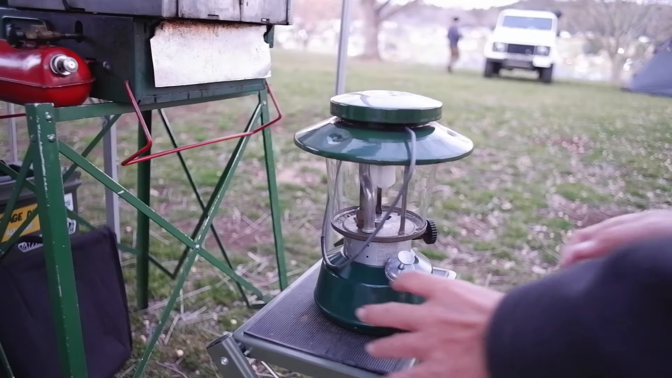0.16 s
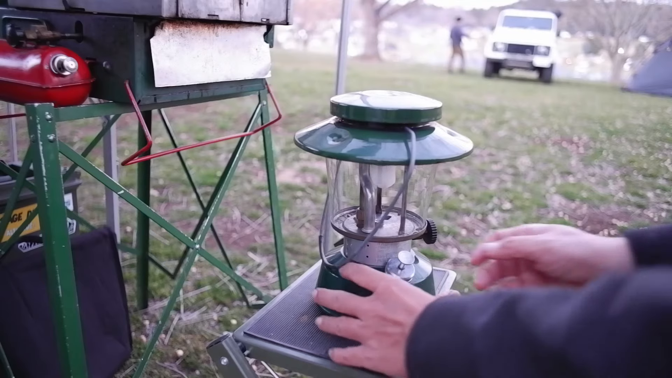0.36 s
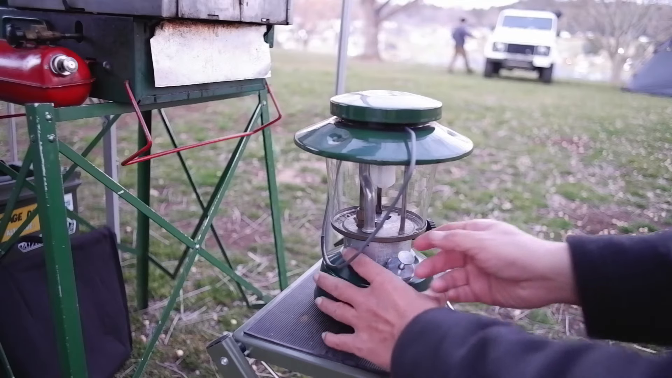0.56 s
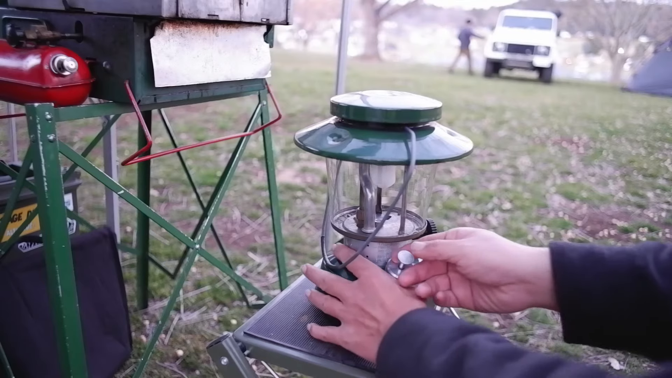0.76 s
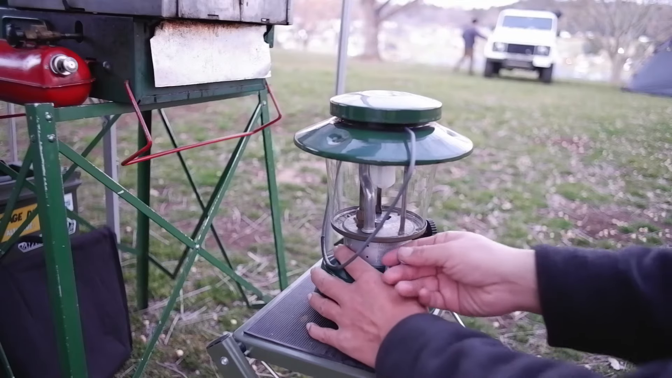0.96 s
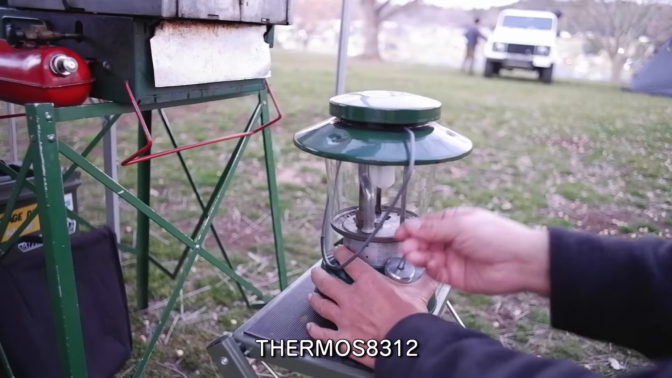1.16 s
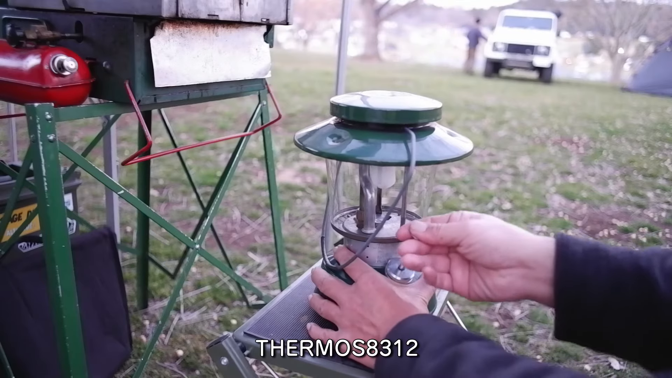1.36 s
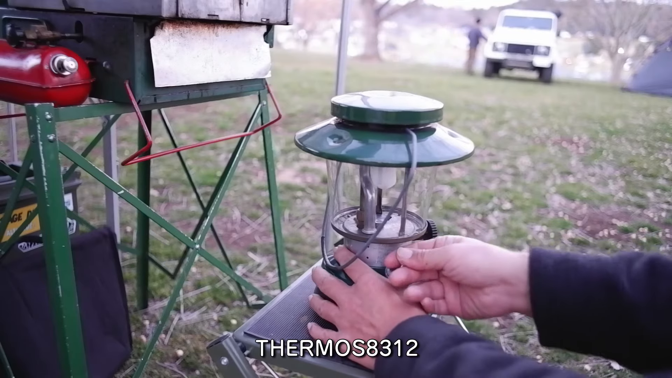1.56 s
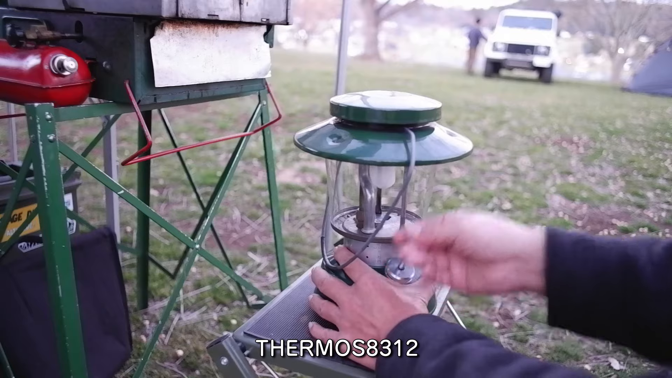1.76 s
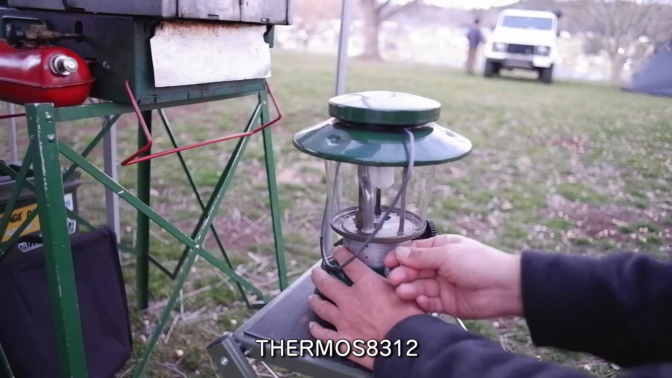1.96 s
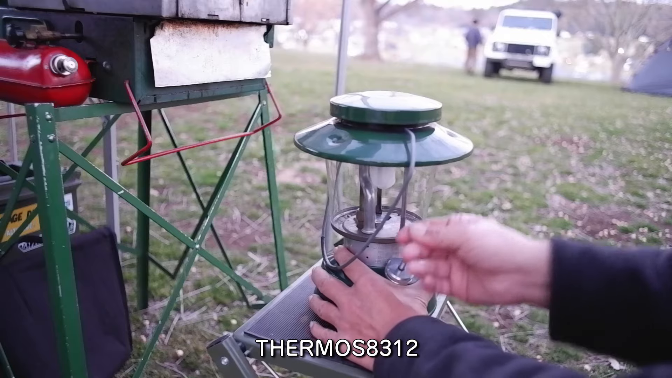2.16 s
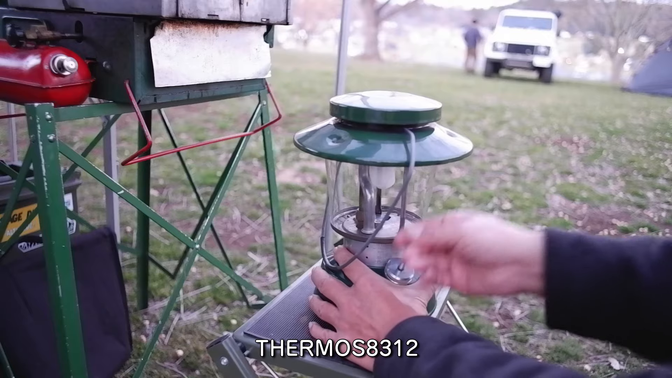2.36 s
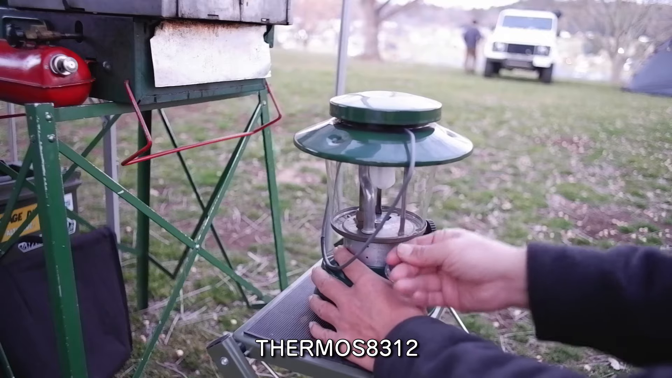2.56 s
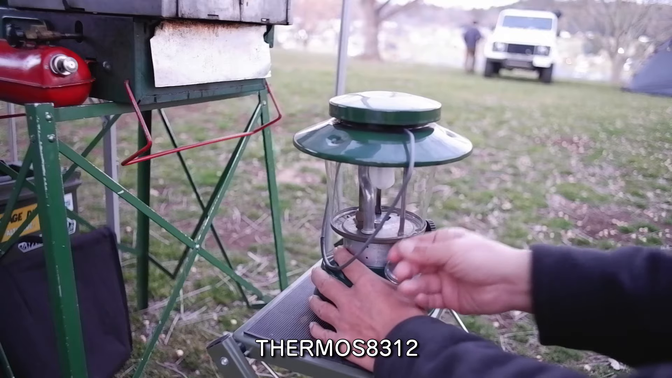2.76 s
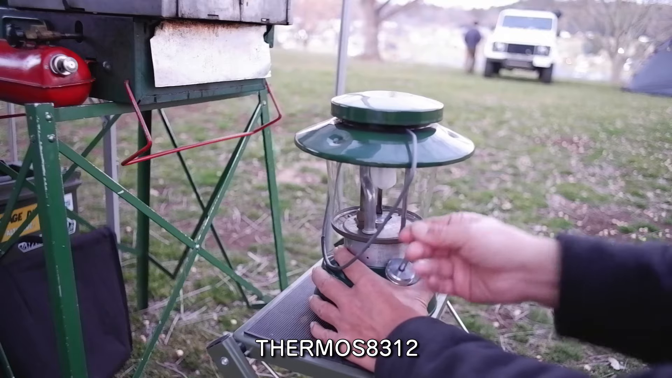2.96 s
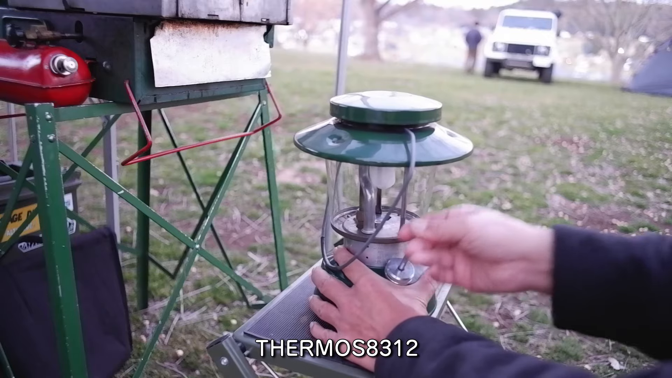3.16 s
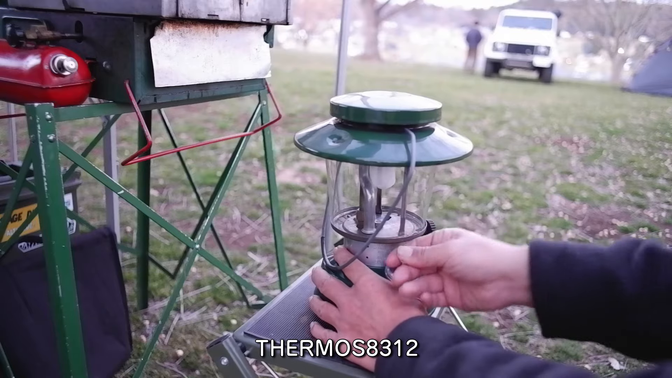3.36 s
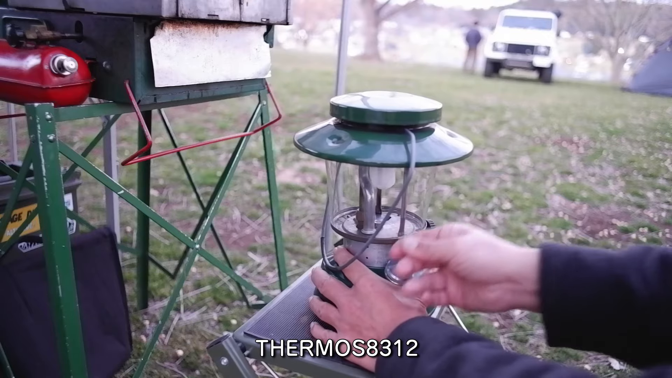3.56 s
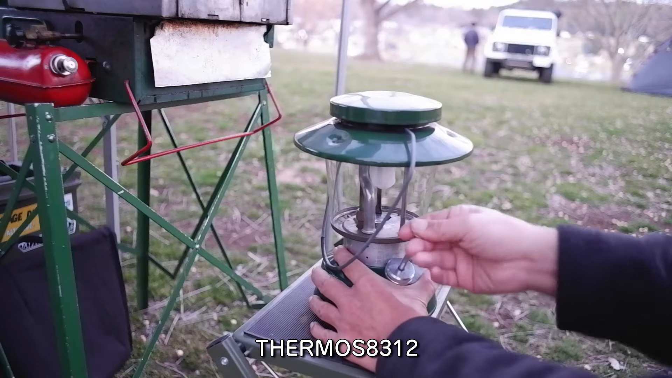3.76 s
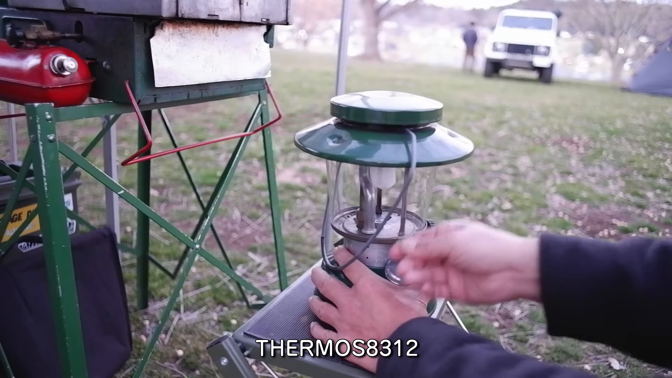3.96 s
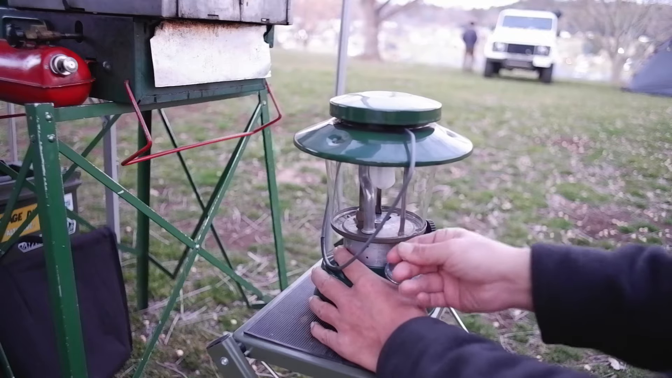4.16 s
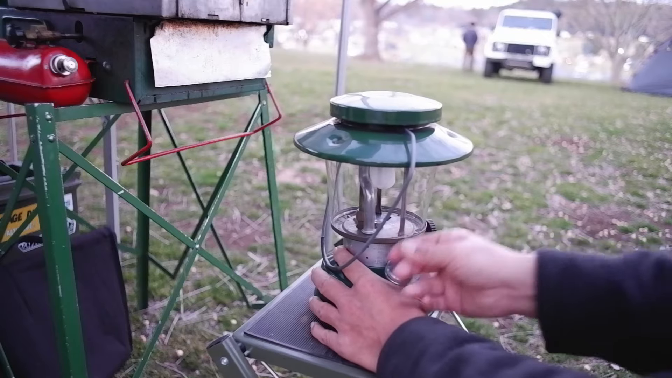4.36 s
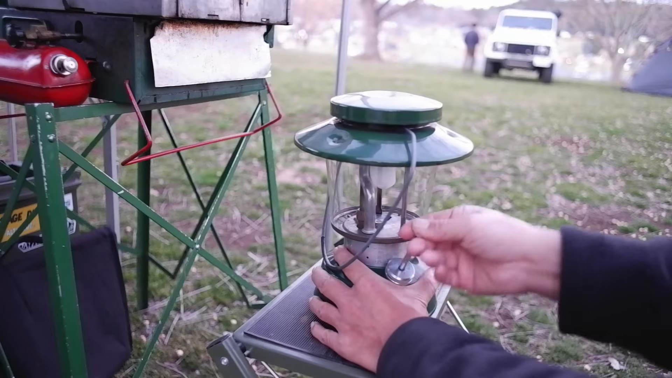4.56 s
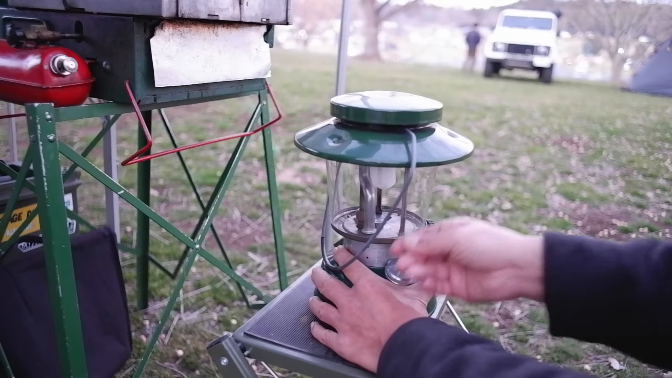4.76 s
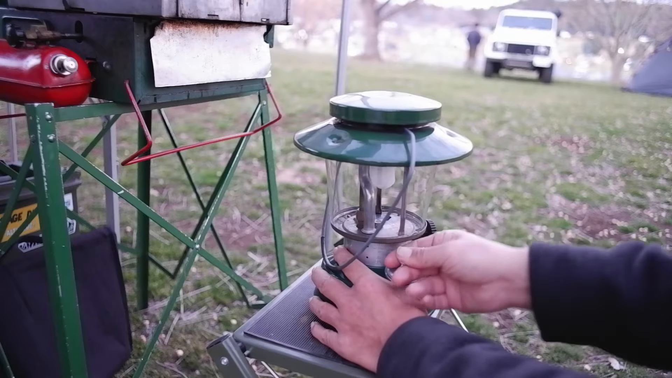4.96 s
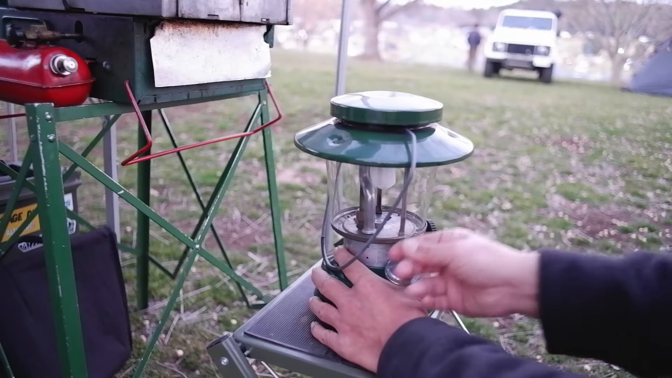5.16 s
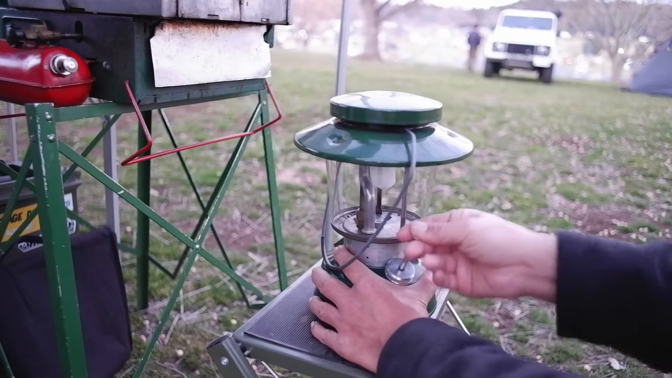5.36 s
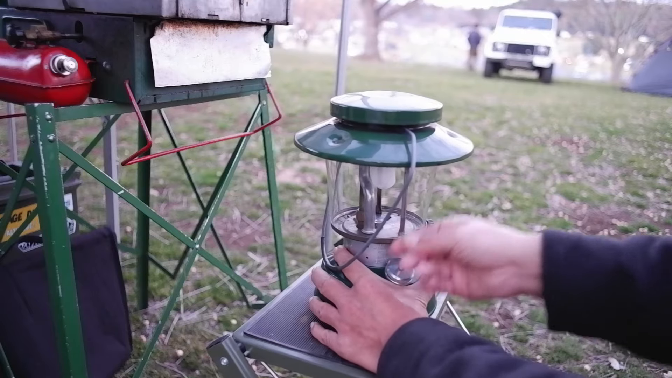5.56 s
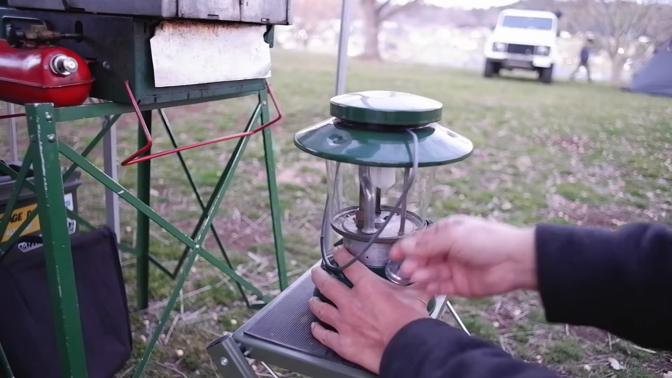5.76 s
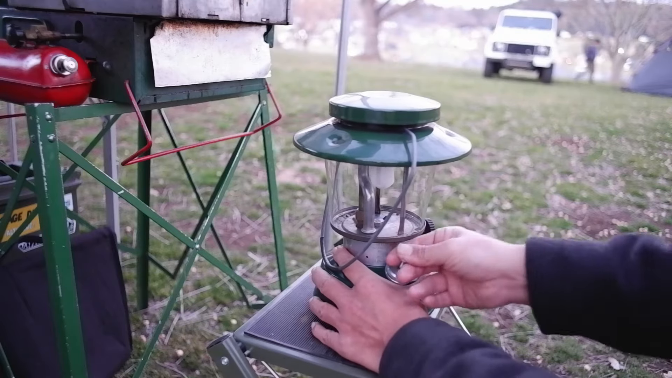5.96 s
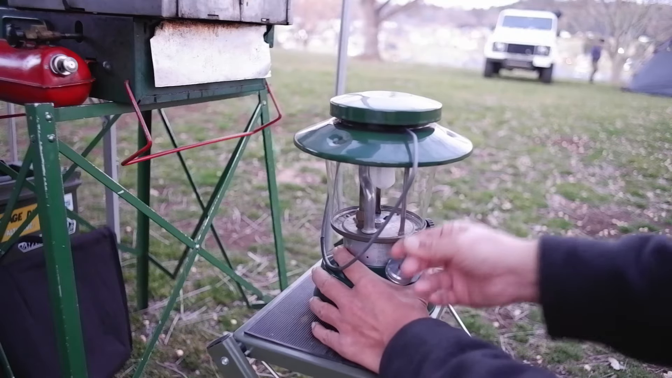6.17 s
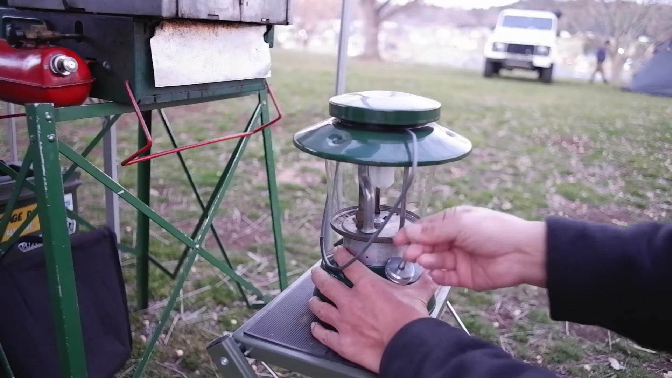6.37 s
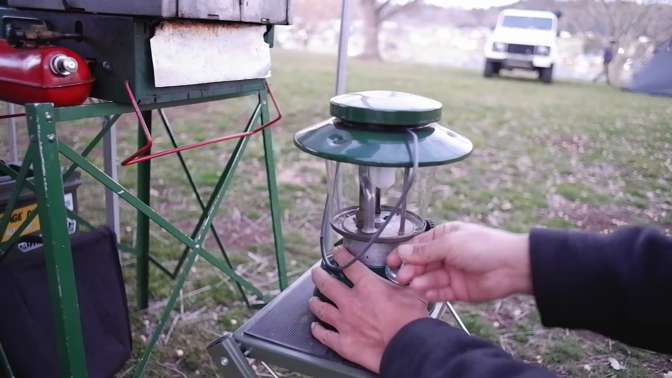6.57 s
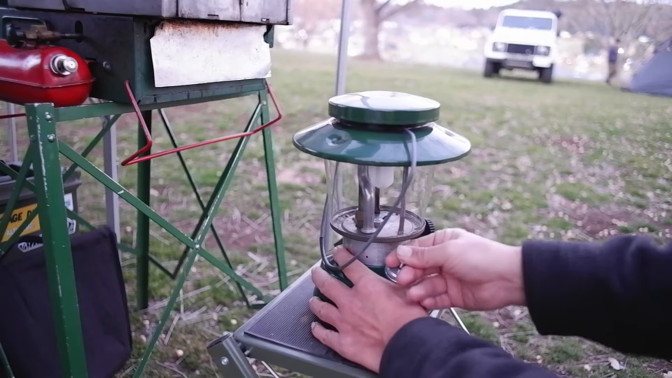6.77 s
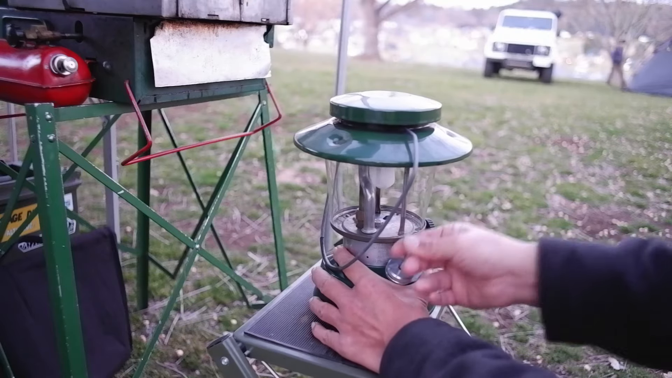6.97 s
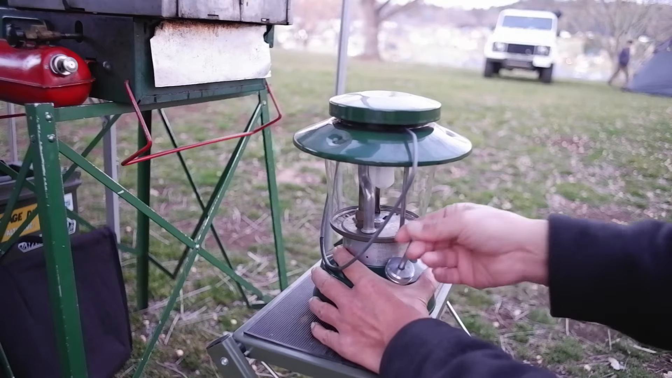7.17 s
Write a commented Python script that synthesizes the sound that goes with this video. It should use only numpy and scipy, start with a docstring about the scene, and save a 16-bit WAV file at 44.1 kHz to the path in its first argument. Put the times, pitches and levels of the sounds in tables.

```python
"""A liquid-fuel lantern is pumped up on a camp table outdoors, close to a stereo microphone.
Over the faint rush of a still campsite a hand settles on it, takes hold and frees the knob with a clink.
From 1.65 s each stroke ends in a falling squeak of the pump's cup and a spit of air; the rod rubs,
the plunger sometimes clicks on its stop, and the steel tank rings.
Near 6 s the pressure builds: the squeak slides more slowly and stays higher."""
import sys
import numpy as np
from scipy import signal
from scipy.fft import rfft, irfft, next_fast_len
from scipy.io import wavfile
from scipy.ndimage import map_coordinates

SR = 44100
rng = np.random.default_rng(int(sys.argv[2]) if len(sys.argv) > 2 else 0)


def to_wav(sig):
    """Store sig (one row per channel, or 1-D mono) as 16-bit WAV at the path in sys.argv[1].

    Samples outside -1..1 are clipped; the rate is SR.
    """
    pcm = np.clip(np.atleast_2d(sig), -1, 1) * 32767
    pcm = np.round(pcm).astype(np.int16)
    wavfile.write(sys.argv[1], SR, pcm.T)  # frames by channels


N = 318133


def amp(db):
    return 10 ** (np.asarray(db) / 20)


def unit(x):
    return x / np.sqrt(np.mean(x ** 2) + 1e-20)


def along(points, hz):
    """Read (freq_hz, value) points on a log frequency axis."""
    freqs, values = np.transpose(points)
    return np.interp(np.log(hz + 1), np.log(freqs + 1), values)


def wobble(rate_hz, size):
    """A smooth random curve with rate_hz knots a second."""
    knots = rng.standard_normal(int(size * rate_hz / SR) + 4)
    return map_coordinates(knots, [np.arange(size) * rate_hz / SR])


def filtered(x, response):
    """x through a complex response of frequency."""
    size = x.shape[-1]
    padded = next_fast_len(size + SR)
    return irfft(rfft(x, padded) * response(np.fft.rfftfreq(padded, 1 / SR)), padded)[..., :size]


def coloured(x, spectrum):
    """x through a curve of (freq_hz, gain_db) points."""
    return filtered(x, lambda hz: amp(along(spectrum, hz)))


def resonate(x, modes):
    """x through (pitch_hz, width_hz, gain_db) resonances."""
    return filtered(x, lambda hz: sum(amp(db) * 1j * hz * width / (pitch ** 2 - hz ** 2 + 1j * hz * width)
                                      for pitch, width, db in modes))


def noise(spectrum, size):
    """Coloured noise of rms 1."""
    return unit(coloured(rng.standard_normal(size), spectrum))


def grit(depth_db):
    """White noise of rms 1, clumped into tiny sharp grains."""
    return unit(rng.standard_normal(N) * amp(depth_db * np.clip(wobble(2500, N), -2, 2)))


def add(track, start_s, sound):
    """Mix a sound into the track."""
    part = track[max(round(start_s * SR), 0):][:len(sound)]
    part += sound[:len(part)]


# open air, far from the microphone: freq_hz, level_db
CAMPSITE_SPECTRUM = [(15, -72.5), (25, -25), (82, -15), (108, -7.5), (141, -4.5), (200, -8), (242, -5.5),
                     (354, -8), (476, -12), (2350, -17), (4030, -26), (5880, -31), (16000, -35.5)]


def campsite():
    """A far outdoor rush, mostly common to both channels."""
    mid = noise(CAMPSITE_SPECTRUM, N)
    side = amp(-10) * noise(CAMPSITE_SPECTRUM, N)
    return amp(-63.5 + 0.45 * wobble(2.54, N)) * np.array([mid + side, mid - side])


# hand and sleeve on the lantern, close up: start_s, level_db
HAND_BUMPS = [(0.026, -47.5), (0.052, -55), (0.305, -60), (1.157, -60), (6.194, -51.5)]


def hand_bumps():
    """A hand settles on the lantern with dull, short taps."""
    out = np.zeros(N)
    t = np.arange(SR // 4) / SR
    rise = 1 - np.exp(-t / 0.00083)
    dull = [(100, -27.5), (350, -0.5), (1300, -3), (3500, -18), (9000, -28), (16000, -41)]
    for start_s, level_db in HAND_BUMPS:
        add(out, start_s, amp(level_db + 4 - 60 * t / 0.11) * rise * noise(dull, len(t)))
    return out


# modes of the steel tank and hood: pitch_hz, level_db, t60_s
TANK_MODES = [(586, -3.5, 1.6), (900, -2, 0.48), (1366, 3, 0.64), (2160, 6.5, 0.48), (2900, -13.5, 0.89),
              (3020, -1.5, 1.04), (3430, 7.5, 0.2), (3870, -8, 0.52), (4050, -4, 0.29), (4200, -3, .35),
              (4830, 2, 0.3), (5800, 4.5, 0.46), (7000, -9, 0.59), (8333, -33, .35)]


def tank_ring(drive):
    """The tank's modes, shaken at random as hard as the lantern is sounding."""
    pitch_hz, level_db, t60_s = np.transpose(TANK_MODES)
    width_hz = np.log(1000) / (np.pi * t60_s)
    gain_db = level_db + 20 * np.log10(SR / (2 * np.pi * width_hz))
    shaking = np.abs(drive) * rng.standard_normal(N)
    return resonate(shaking, list(zip(pitch_hz, width_hz, gain_db)))


# resonances of pump tube and tank: pitch_hz, width_hz, gain_db
TUBE_MODES = [(439.5, 75, -1), (549, 12.9, 5), (755, 30, -14), (901, 176, -8.5), (1254.5, 45.7, 8),
              (1311, 34, 1), (1660, 37, -1), (2040, 91, -3), (2300, 87, -2), (2875, 23, -7)]


def pump_tube(x):
    """The tube and tank colour the knocks and squeaks made inside them."""
    return resonate(x, TUBE_MODES)


# fingers and rod catching on the tank: start_s, level_db, knock_offset_db
ROD_CATCHES = [(0.488, -44, 9), (0.5435, -34.5, -2), (0.6144, -44.5, -0.5), (0.855, -36, 0),
               (1.2645, -33, -21), (1.3136, -41.5, 2.5), (1.3613, -29, -33), (1.382, -40, -30),
               (1.9308, -30, -9.5), (1.9656, -25, -24), (2.262, -26, -12), (2.5526, -27, -15),
               (2.8566, -27, -17.5), (3.082, -23, -11.5), (3.1253, -26.5, -4), (3.3408, -31.5, -14),
               (3.3772, -41, -2), (3.6234, -34.5, -1.5), (4.7164, -43.5, -9), (5.254, -35, -32),
               (5.999, -31.5, -17), (6.037, -25, -7.5), (6.2594, -33, -16), (6.4285, -24.5, -17),
               (6.9544, -17.5, -14.5)]
# metal sliding on metal, close up: freq_hz, gain_db
SCRAPE_SPECTRUM = [(410, -31), (700, -0.5), (1350, 0), (1820, 2), (2190, -6), (2560, -4.5), (4210, -2),
                   (5330, -5), (5840, -0.5), (8210, -12.5), (16000, -14.5)]
# resonances of the scraped rod: pitch_hz, width_hz, gain_db
ROD_MODES = [(1720, 59, -20), (3685, 140, 0), (4140, 110, -3.5), (6200, 570, -16.5)]


def rod_rubbing(grip_s=0.51, slide_from_s=1.67, slide_rise_s=0.5):
    """Fingers rub the knob, then the rod scrapes unevenly through its cap, catching now and then."""
    catches, knocks = np.zeros((2, N))
    t = np.arange(SR // 4) / SR
    rise = 1 - np.exp(-t / 0.00063)
    # the rod snags faintly twice on every return
    snags = [(start_s + 0.19 + 0.03 * late, -41.5 + 2 * hard, -4.5)
             for start_s, *_ in PUMP_STROKES for late, hard in rng.standard_normal((2, 2))]
    for start_s, level_db, knock_offset_db in ROD_CATCHES + snags:
        add(catches, start_s, amp(level_db - 12.5 - 60 * t / 0.1) * rise)
        add(knocks, start_s, amp(level_db + knock_offset_db - 1.5 - 60 * t / 0.27) * rise)
    now = np.arange(N) / SR
    grip = amp(-70) * (now > grip_s)
    pumping = amp(-57) * np.clip((now - slide_from_s) / slide_rise_s, 0, 1)
    sliding = (grip + pumping) * unit(amp(7.2 * wobble(50, N)))
    scrape = (sliding + catches) * grit(depth_db=2.5)
    metal = amp(5) * coloured(scrape, SCRAPE_SPECTRUM) + amp(10) * resonate(scrape, ROD_MODES)
    return metal + pump_tube(knocks * rng.standard_normal(N))


# the pump knob is unlocked: start_s, level_db
KNOB_UNLOCK = [(0.6922, -16)]
# the clink's ring, bright knob modes over two low notes of the tank: pitch_hz, level_db, t60_s
CLINK_MODES = [(580, -22.5, 1.32), (920, -16.5, 0.57), (1610, -15, 0.33), (2150, -19, .33),
               (3400, -4, 0.18), (3750, -0.5, 0.14), (4400, -9, .17), (4600, -7, 0.22), (5470, -16, .16),
               (5660, 2, .14), (6126, -1, 0.15), (6200, 4.5, .19), (8150, -14, .27)]
# rattling metal of knob and plunger, close up: freq_hz, level_db
RATTLE_SPECTRUM = [(120, -67), (200, -22), (1000, -13.5), (1270, 0.5), (2090, -5), (3130, -5.5), (3690, -3),
                   (5040, -6), (6400, -0.5), (7410, -12), (9230, -19), (10100, -21), (16000, -33)]


def knob_clink():
    """The knob comes free with a rattle and a bright clink."""
    out = np.zeros(N)
    t = np.arange(SR) / SR
    rise = 1 - np.exp(-(t / 0.0035) ** 2)
    for start_s, level_db in KNOB_UNLOCK:
        clink = sum(amp(db + rng.normal() - 60 * t / t60_s) * np.sin(2 * np.pi * (hz * t + rng.random()))
                    for hz, db, t60_s in CLINK_MODES)
        rattle = amp(-60 * t / 0.13) * noise(RATTLE_SPECTRUM, len(t))
        add(out, start_s - 0.003, amp(level_db) * rise * (amp(-5.5) * rattle + amp(-15) * clink))
    return out


def back_pressure(time_s, slack=0.0845, half_built_s=5.75, firming_s=0.437):
    """0 slack to 1 firm: the first strokes meet little resistance, then the tank fills."""
    return slack + (1 - slack) * (0.5 + 0.5 * np.tanh((time_s - half_built_s) / firming_s))


# pump strokes, close to the microphone: start_s, squeak_db, air_db, tail_offset_db
PUMP_STROKES = [(1.653, -6.5, -16, -10.5), (2.064, -2, -11.5, -14.5), (2.36, -4.5, -11.5, -11),
                (2.643, -6.5, -13.5, -8), (2.904, -5, -13, -11.5), (3.172, -4.5, -12, -19),
                (3.438, -3, -11.5, -14), (3.72, -6.5, -11.5, -10), (3.99, -5, -11, -13.5),
                (4.258, -4.5, -11, -23.5), (4.515, -7, -10.5, -8.5), (4.788, -4, -11.5, -16),
                (5.049, -4, -11.5, -14.5), (5.319, -9.5, -10, -12), (5.583, -5.5, -10.5, -15),
                (5.783, -11, -9, -14.5), (6.065, -6.5, -11, -16), (6.337, -8, -9.5, -13.5),
                (6.611, -6.5, -12, -25), (6.874, -13.5, -8.5, -10), (7.142, -6.5, -11, -13)]
LEAD_S = 0.02  # a stroke's sound begins this long before the cup lets go at start_s
STROKE_TIME_S = np.arange(SR // 2) / SR - LEAD_S


def cup_squeaks(drop_hz=2100, tail_t60_s=0.15):
    """The cup lets go: its pitch drops steeply, then levels out while the note turns rough and fades."""
    out = np.zeros(N)
    for start_s, squeak_db, _, tail_offset_db in PUMP_STROKES:
        pressure = back_pressure(start_s)
        t = STROKE_TIME_S + 0.00169 * pressure  # back pressure lifts the cup a little sooner
        after = np.maximum(t, 0)
        # pressure raises and slows the slide; a stronger stroke slides deeper
        floor_hz = 300.13 + 148.5 * pressure - 12 * (squeak_db + 6)
        fall_s = 0.00135 * (1 + pressure)
        pitch_hz = floor_hz + drop_hz / (1 + after / fall_s)
        phase = 2 * np.pi * np.cumsum(pitch_hz * (1 + 0.0535 * wobble(491, len(t)))) / SR
        note = np.sin(phase) + 0.14 * np.sin(2 * phase) + 0.37 * np.sin(3 * phase)
        opening = 0.5 + 0.5 * np.tanh((t - 0.0007) / (0.00041 * (1 + 1.2 * pressure)))
        burst_s = 0.0049 * (1 + 3.2 * pressure)
        push_db = 3 * pressure * np.minimum(after / 0.0095, 1) ** 2
        burst = amp(push_db) * np.exp(-(after / burst_s) ** 4)
        flutter_db = 3.5 * wobble(220, len(t))
        tail = amp(tail_offset_db + 2.5 - 60 * after / tail_t60_s + flutter_db) / (1 + (t / 0.18) ** 4)
        add(out, start_s - LEAD_S, amp(squeak_db + 0.5) * opening * (burst + tail) * note)
    return pump_tube(out)


# hiss of the air, close up: freq_hz, gain_db
AIR_SPECTRUM = [(18, -84), (30, -17), (194, -21.5), (426, -5.5), (649, 2), (1070, 0), (1280, 1.5),
                (1460, 0), (3220, -3.5), (3580, -2), (5170, -9), (6380, -2.5), (7870, -14.5), (14800, -71),
                (16000, -61.5)]
# resonances blown by the air: pitch_hz, width_hz, gain_db
JET_MODES = [(1241, 29, 2.5), (1760, 81, -2.5), (2340, 11, -3), (2837, 110, -4.5), (3490, 13, 1),
             (3620, 148, -5.5), (4200, 22, -4), (4030, 15, -3), (4747, 42, -6), (5660, 100, -5.5),
             (5900, 39, -22), (6100, 79, -3), (6400, 28, -2), (6930, 69, -20), (7380, 100, -11.5),
             (8620, 130, -19.5), (8300, 80, -29), (8800, 33, -40), (10420, 530, -26)]


def air_spits(drain_t60_s=0.14):
    """A little air leaks past the cup; a gritty spit swells as it opens, then drains away."""
    flow = np.zeros(N)
    t = STROKE_TIME_S
    after = np.maximum(t, 0)
    for start_s, _, air_db, _ in PUMP_STROKES:
        pressure = back_pressure(start_s)
        leak = amp(-30 + 4.7 * pressure) * np.exp(-np.abs(t) / (0.0021 * (1 + 3.6 * pressure)))
        spit = amp(-60 * after / drain_t60_s) * (1 - np.exp(-(after / 0.0057) ** 2))
        add(flow, start_s - LEAD_S, amp(air_db - 2.5) * (leak + spit))
    jet = flow * amp(2.19 * wobble(350, N)) * grit(depth_db=-0.5)
    hiss = amp(6.5) * coloured(jet, AIR_SPECTRUM)
    # the stiffer the air cushion, the less bass gets out
    bass = filtered(hiss, lambda hz: 1 / (1 + (hz / 430) ** 4))
    bass_gain = amp(2 - 7.1 * back_pressure(np.arange(N) / SR))
    return hiss + (bass_gain - 1) * bass + amp(12) * resonate(jet, JET_MODES)


def cylinder_tone(settle_s=0.08):
    """The trapped air column shortens as the plunger turns back, lifting both of its notes."""
    out = np.zeros(N)
    t = STROKE_TIME_S
    after = np.maximum(t, 0)
    glide = 0.088 * (1 - np.exp(-after / settle_s))
    swell = np.exp(-((t - 0.058) / 0.058) ** 2) * (1 - np.exp(-after / 0.0088))
    for start_s, *_ in PUMP_STROKES:
        pressure = back_pressure(start_s)
        pitch_ratio = 1 + 0.07 * pressure + glide + 0.022 * wobble(140, len(t))
        phase_per_hz = 2 * np.pi * np.cumsum(pitch_ratio) / SR
        notes = np.sin(1200 * phase_per_hz) + 0.37 * np.sin(480 * phase_per_hz)
        level_db = -43 + 2.5 * pressure + 3.9 * wobble(60, len(t))
        add(out, start_s - LEAD_S, amp(level_db) * swell * notes)
    return out


# bright snap of the cup's lip: freq_hz, level_db
SNAP_SPECTRUM = [(3000, -51), (8000, 0), (10500, -4), (13000, -2), (16000, -5)]


def cup_snaps(t60_s=0.04):
    """The cup's lip crackles brightly as it lets go."""
    envelope = np.zeros(N)
    t = np.arange(SR // 4) / SR
    rise = 1 - np.exp(-(t / 0.003) ** 2)
    for start_s, *_ in PUMP_STROKES:
        add(envelope, start_s, amp(-29.5 - 60 * t / t60_s) * rise)
    return envelope * noise(SNAP_SPECTRUM, N) * amp(4 * np.clip(wobble(600, N), -2, 2))


# the plunger strikes its stop: start_s, level_db, knock_offset_db
PLUNGER_CLICKS = [(1.7253, -12, 7), (2.0975, -10.5, 12), (2.819, -26.5, -30), (4.5616, -12, -16),
                  (5.0897, -11, 5), (5.6327, -14.5, -31), (5.8276, -11.5, -6), (6.378, -9.5, -8.5),
                  (6.647, -11.5, -7)]


def plunger_clicks():
    """Metal meets metal: a crack, a short rattle and a knock of the tube."""
    cracks, knocks = np.zeros((2, N))
    t = np.arange(SR // 4) / SR
    rise = 1 - np.exp(-t / 0.00021)
    envelope = rise * (amp(-60 * t / 0.04) + 0.42 * amp(-60 * t / 0.13))
    for start_s, level_db, knock_offset_db in PLUNGER_CLICKS:
        add(cracks, start_s, amp(level_db - 7.5) * envelope * noise(RATTLE_SPECTRUM, len(t)))
        impact = rise * noise([(200, -40.5), (900, -9), (16000, -1)], len(t))
        add(knocks, start_s, amp(level_db + knock_offset_db + 18 - 60 * t / 0.0038) * impact)
    return cracks + pump_tube(knocks)


# the lantern's stereo width at the microphone: freq_hz, side_gain_db
STEREO_WIDTH = [(60, 2), (110, -16), (200, 6), (380, -15), (700, -13), (1290, -23), (2380, -14.5),
                (4400, -12.5), (8120, -4.5), (15000, 2)]


def microphone_ports(x, shift_rad=0.54, shifts_per_s=3):
    """Hood, glass and hand scatter each pitch onto the two ports with a slightly different phase."""
    def scattered():
        grid_hz = np.linspace(0, SR / 2, 100)
        scatter = rng.standard_normal(100)
        return filtered(x, lambda hz: 1j * amp(along(STEREO_WIDTH, hz) - 0.5)
                        * np.interp(hz, grid_hz, scatter))
    shift = shift_rad * wobble(shifts_per_s, N)  # the moving hand shifts the image
    side = np.cos(shift) * scattered() + np.sin(shift) * scattered()
    return np.array([x + side, x - side]) * amp([[-0.3], [0.3]])


# echo of the camp gear around the microphone: freq_hz, t60_s
ECHO_DECAY = [(100, .2), (500, 0.32), (2000, 0.19), (6000, 0.14), (14000, 0.15)]


def camp_echo(x):
    """Table, stove and ground scatter a short tail, different in each channel."""
    hz, t, spectra = signal.stft(rng.standard_normal((2, SR // 2)), SR, nperseg=256)
    decay = amp(-60 * t / along(ECHO_DECAY, hz)[:, None])
    _, tail = signal.istft(spectra * decay, SR, nperseg=256)
    return signal.fftconvolve(x[None], tail / np.linalg.norm(tail[0]), axes=1)[:, :N]


def scene():
    """The lantern close in front, its faint echo from the camp gear, and the campsite far behind."""
    touches = hand_bumps() + rod_rubbing()
    strokes = cup_squeaks() + air_spits() + cylinder_tone() + cup_snaps() + plunger_clicks()
    ring = amp(-66.5) * tank_ring(strokes + amp(11.5) * touches)  # direct contact shakes it harder
    treble_rolloff = [(9500, -0.5), (12500, -13), (16000, -13.5)]  # the sound softens above 10 kHz
    lantern = coloured(touches + strokes + ring, treble_rolloff) + knob_clink()
    return microphone_ports(lantern) + amp(-24) * camp_echo(lantern) + campsite()


def record(dry, ceiling=0.95, top_hz=16000):
    """The recorder rounds off the tallest peaks and keeps nothing above its band limit."""
    rounded = dry / (1 + np.abs(dry / ceiling) ** 8) ** (1 / 8)
    return filtered(rounded, lambda hz: hz < top_hz)


dry = scene()
out = record(dry)
to_wav(out)
```